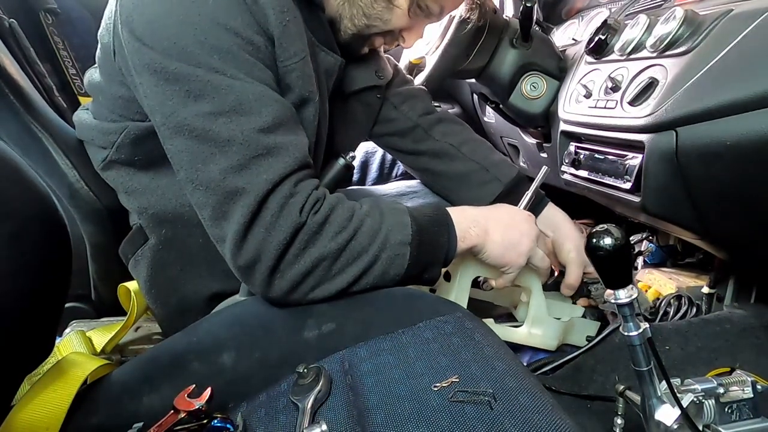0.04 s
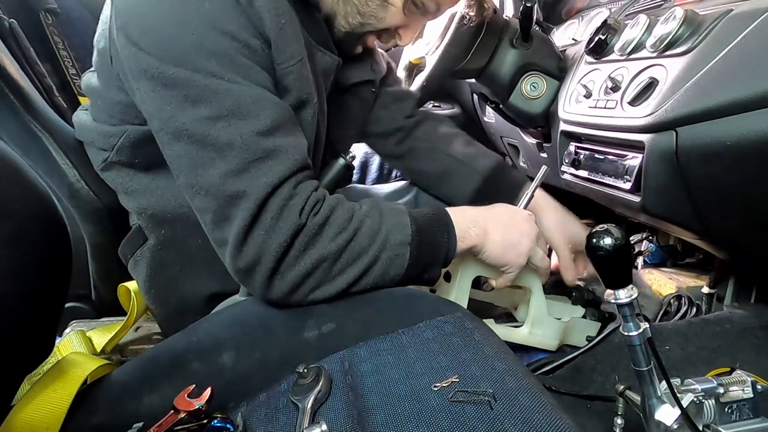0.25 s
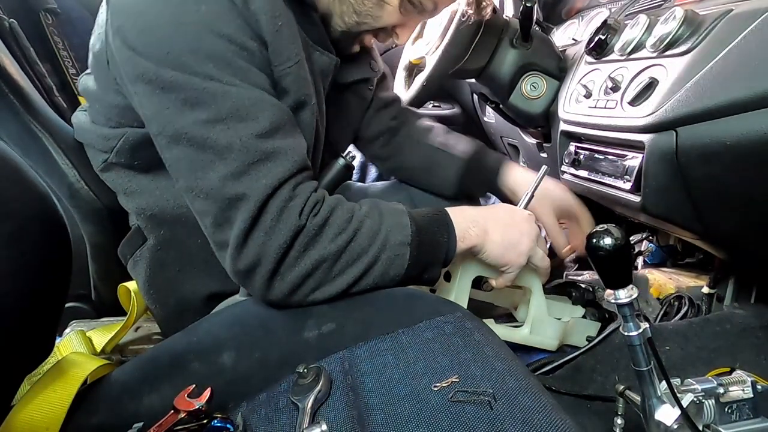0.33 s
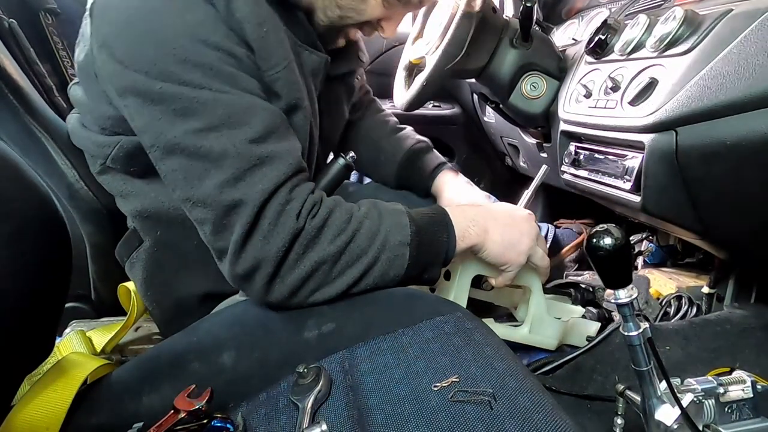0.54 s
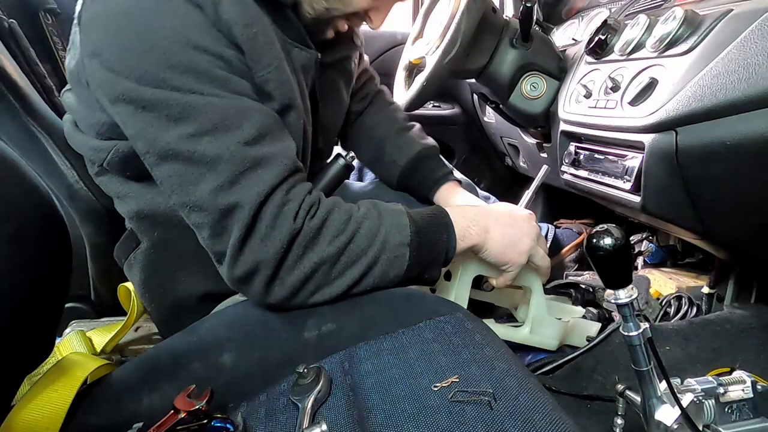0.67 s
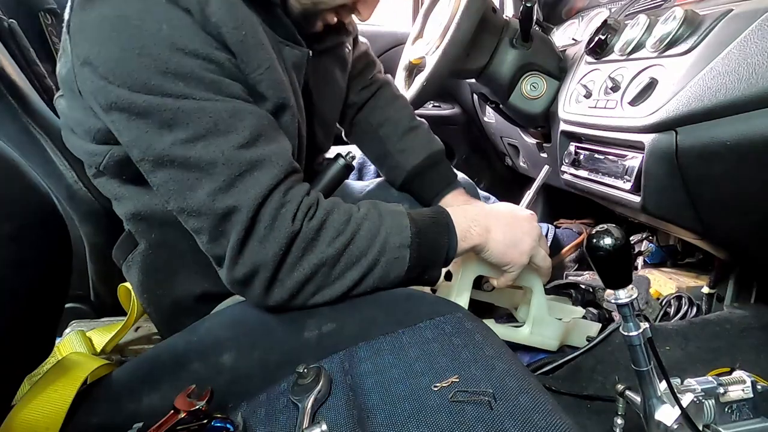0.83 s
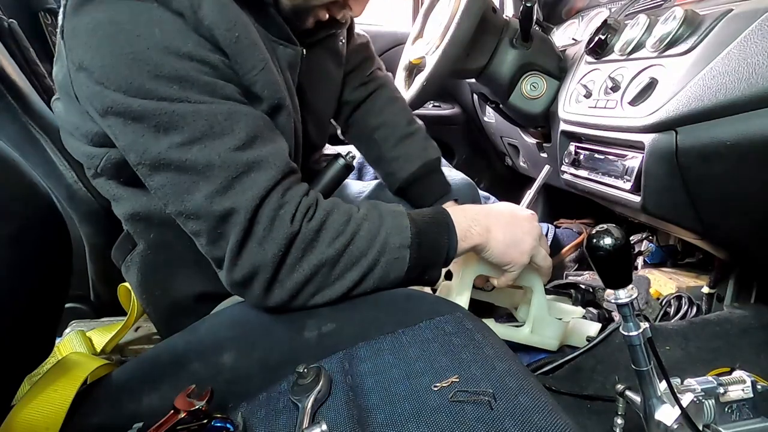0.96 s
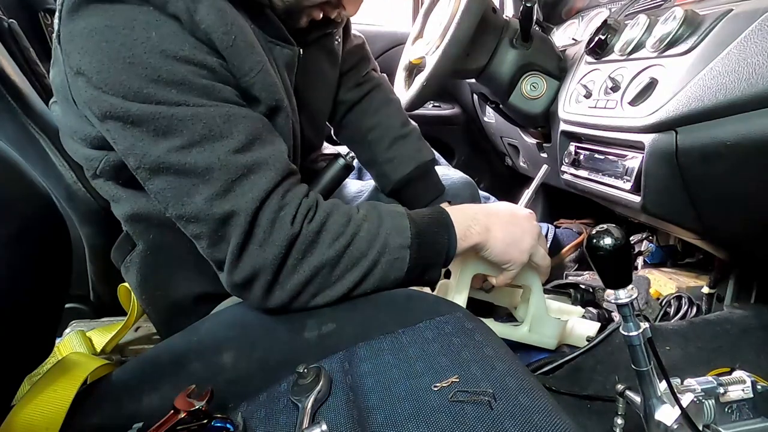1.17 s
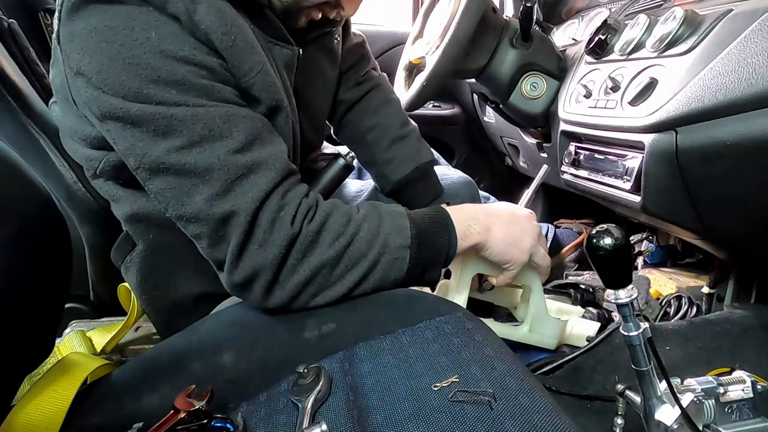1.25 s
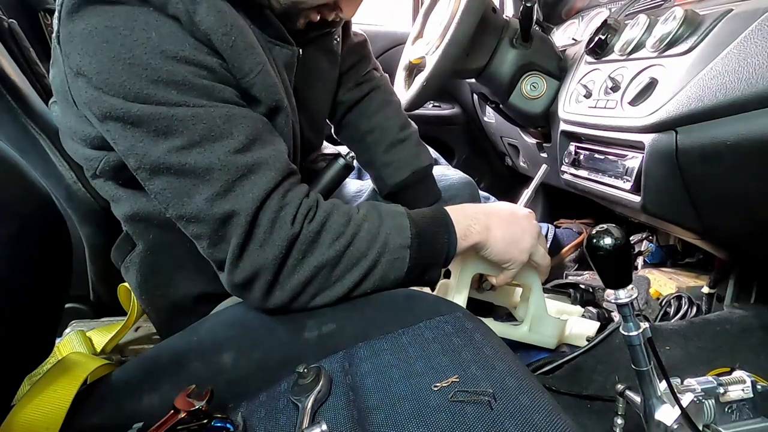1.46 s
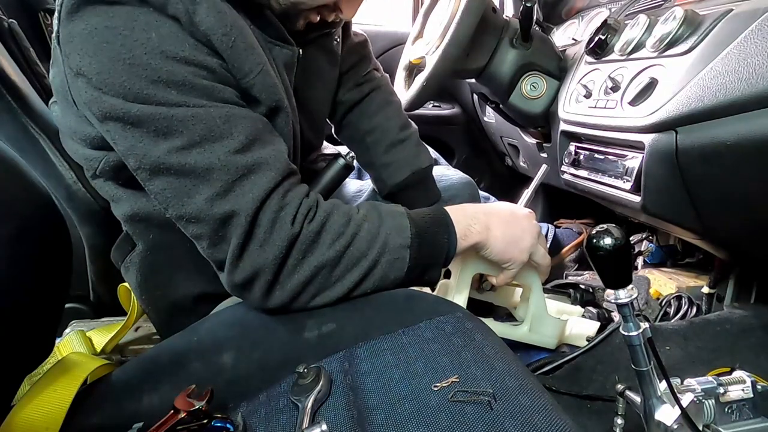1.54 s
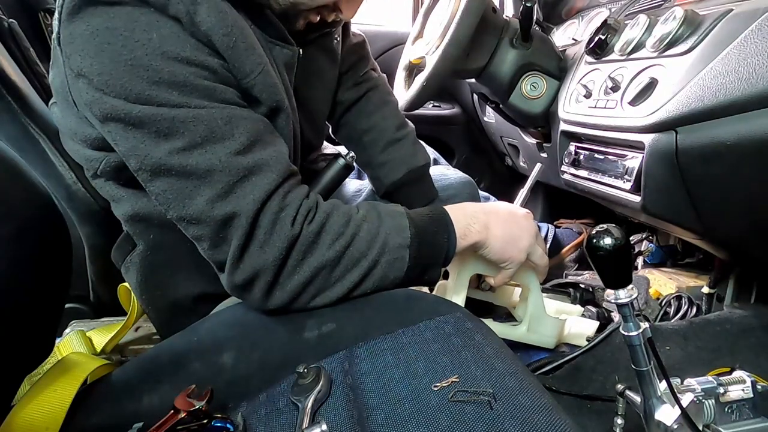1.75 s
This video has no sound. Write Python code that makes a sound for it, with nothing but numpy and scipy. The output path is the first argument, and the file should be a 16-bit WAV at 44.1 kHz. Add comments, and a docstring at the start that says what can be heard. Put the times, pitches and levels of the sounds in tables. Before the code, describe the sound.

Hard clunks and faint scraping of plastic console parts being handled inside a car.

```python
"""Someone works the handbrake lever and loose console parts inside a parked car.
Light knocks and a short scrape lead into two hard clunks (0.31 s, 0.43 s) that ring briefly and make
the cabin boom. A sleeve swishes and air moving over the microphone adds a deep, faint rumble.
From about 0.9 s a plastic part scrapes along its seat among small knocks, cloth rubs and metal clinks.
A third clunk lands at 1.53 s, and a last faint scrape and soft thud follow."""
import sys
import numpy as np
from scipy import signal
from scipy.fft import rfft, irfft
from scipy.io import wavfile

SR = 44100
rng = np.random.default_rng(int(sys.argv[2]) if len(sys.argv) > 2 else 0)


def put_to_file(sound):
    """Save the sound as 16-bit audio at rate SR, in the file named by the first command-line argument."""
    columns = np.atleast_2d(sound).T  # one column per channel
    safe = np.clip(columns, -1, 1)
    whole_steps = np.round(safe * 32767)
    wavfile.write(sys.argv[1], SR, whole_steps.astype(np.int16))


N = 79380
TIME, FREQS = np.arange(N) / SR, np.fft.rfftfreq(N, 1 / SR)

# steady room tone of the car: f/Hz, level/dB
ROOM_TONE = [(59, -66), (100, -16), (240, -0.5), (439, -15), (854, -11.5), (1920, -16), (4810, -29.5),
             (8620, -40.5), (11300, -38.5), (12800, -48), (14500, -79.5)]
# envelope of the deep, faint rumble of air moving over the microphone: t/s, level/dB
RUMBLE_ENVELOPE = [(0, -80), (.3, -62), (.5, -59), (.545, -43), (.59, -54), (.67, -48.5), (.8, -57.5),
                   (.95, -72), (1.8, -67)]
# spectrum of that rumble: f/Hz, level/dB
RUMBLE_COLOUR = [(10, -29), (33, 20.5), (50, -9), (90, -23), (300, -61)]
# envelope of the low shuffling: t/s, level/dB
SHUFFLE_ENVELOPE = [(0, -57), (.09, -61.5), (.2, -44), (.25, -60), (.36, -42.5), (.44, -42.5), (.5, -44),
                    (.6, -56), (.74, -56), (.82, -62.5), (1.05, -69), (1.2, -59), (1.42, -69), (1.6, -50.5),
                    (1.68, -66), (1.8, -59)]
# spectrum of that shuffling: f/Hz, level/dB
SHUFFLE_COLOUR = [(30, -27.5), (70, 5), (125, 4.5), (250, -4), (400, -9), (800, -32), (2000, -46.5)]
# decay of the cabin reverb: f/Hz, t60/s
CABIN_T60 = [(80, 0.6), (250, 0.17), (700, 0.21), (3000, 0.15), (12000, 0.37)]
# send to the cabin reverb: f/Hz, level/dB
CABIN_SEND = [(80, -22), (300, -3), (700, -19.5), (2000, -32), (12000, -15.5)]

# sleeve swishes: peak t/s, level/dB, rise/s, t60/s
SWISHES = [(.39, -49.5, 0.069, 0.44), (0.539, -51.5, 0.14, 0.66)]
# soft spectrum of a swish: f/Hz, level/dB
SWISH_COLOUR = [(240, -38), (400, -8), (704, 0), (829, 0.5), (1200, -6), (3730, -9), (5170, -19),
                (10400, -30.5), (14000, -33)]
# quick cloth rubs: peak t/s, level/dB, half-width/s
RUBS = [(0.277, -44, 0.014), (1.067, -55, 0.026), (1.256, -55, 0.029)]
# bright spectrum of a rub: f/Hz, level/dB
RUB_COLOUR = [(300, -25), (2500, 2), (4500, -5.5), (5800, -4), (7200, -6.5), (8800, -19), (10500, -16),
              (14000, -32)]

# strokes of the sliding plastic part, one envelope each: t/s, level/dB
SCRAPE_STROKES = [
    [(.24, -57.5), (.262, -54.5), (.274, -44), (.285, -44), (.298, -41.5), (.304, -53)],
    [(.94, -74), (1.0, -58.5), (1.045, -64), (1.07, -49), (1.11, -48.5), (1.14, -50), (1.175, -50),
     (1.215, -61.5), (1.255, -56), (1.303, -55), (1.316, -46), (1.335, -51), (1.356, -61), (1.395, -62),
     (1.43, -71.5), (1.485, -60), (1.512, -52), (1.53, -47.5)],
    [(1.63, -72), (1.657, -55.5), (1.685, -76)],
]
# spectrum of its friction hiss: f/Hz, level/dB
SCRAPE_COLOUR = [(240, -14.5), (400, -9), (758, 3), (893, -2.5), (962, -2.5), (1100, -5), (2050, -5),
                 (2650, -12.5), (4200, -7.5), (4520, -13), (10100, -33), (14000, -43)]
# its resonances: f/Hz, bandwidth/Hz, level/dB
SCRAPE_RINGS = [(992, 74, -11.5), (1250, 110, -20), (3180, 23, -18.5), (3400, 210, -14.5),
                (4110, 30, -20.5)]

# small metal pieces touching: t/s, f/Hz, level/dB, t60/s
PINGS = [(0.1716, 4300, -48.5, 0.073), (.3362, 3620, -27, 0.021), (1.1277, 4140, -42, .06),
         (1.5155, 1263, -29, 0.037)]
# modes of a loose metal fitting: f/Hz, level/dB, t60/s
FITTING_MODES = [(840, -12.5, 0.17), (1160, -4, 0.091), (1314, -10.5, 0.14), (2280, -17, 0.11),
                 (3233, 3.5, 0.079), (3420, -4, 0.064), (3840, -16, 0.14)]
# touches on that fitting: t/s, level/dB, tilt/(dB per octave), rise/s
CLINKS = [(0.271, -45.5, 14, 0.0035), (1.3112, -41, -3.5, 0.0016), (1.383, -54, -2, .006)]
# EQ points that voice the knocks: f/Hz
KNOCK_BANDS_HZ = [150, 550, 1200, 2200, 4300, 7000, 11000]
# light knocks and clicks: t/s, t60/s, then level/dB at each EQ point
KNOCKS = [(0.0983, 0.079, -40, -29.5, -41, -41.5, -79, -65, -90),
          (0.118, 0.18, -42.5, -38, -54, -57, -78, -86, -88),
          (0.1709, 0.073, -68, -36.5, -48, -43.5, -45, -56, -89),
          (.283, 0.11, -47, -33.5, -26, -72, -35, -70, -66),
          (.336, 0.08, -24.5, -35.5, -36, -41, -37, -52, -62),
          (0.3761, 0.036, -63, -29, -54, -44, -46, -49.5, -61),
          (0.4226, 0.03, -58, -59, -57, -36, -42, -40, -41.5),
          (.443, 0.069, -51, -28.5, -53, -50, -51, -53, -45),
          (0.876, 0.23, -44, -47.5, -59.5, -79, -89, -85, -92),
          (0.938, 0.18, -49, -51, -53.5, -69, -68, -83, -92),
          (1.131, 0.07, -43.5, -56, -48, -47, -40, -48, -57.5),
          (1.5136, 0.061, -38.5, -34.5, -33, -39, -50, -59, -64),
          (1.537, .035, -64, -68, -56, -39, -25.5, -45, -64)]
# low thuds of console and floor: t/s, f/Hz, level/dB, time to peak/s
THUDS = [(.102, 137.3, -35, 0.014), (.283, 213, -35, 0.009), (.311, 135, -23.5, 0.0081),
         (.310, 245.6, -26, 0.0067), (.427, 151, -28.5, 0.0059), (.427, 254, -28, 0.0044),
         (.459, 283, -27.5, 0.0058), (.462, 147, -34.5, 0.011), (0.878, 149, -65, 0.02),
         (0.938, 247, -36, 0.0038), (1.16, 224, -47, 0.0059), (1.193, 127, -50.5, 0.0073),
         (1.289, 208, -42.5, 0.0028), (1.523, 267.3, -29, 0.00714), (1.539, 139, -27, 0.0071),
         (1.722, 130, -43, 0.012)]

# modes of the lever, its stop and the latch: f/Hz, level/dB, t60/s
LEVER = [(476, -28, 0.075), (566, -33, 0.22), (685, -24.5, 0.1), (776, -19, 0.049), (982, -18, 0.075),
         (1210, -23, 0.07), (1286, -19, 0.06), (1505, -16.5, 0.048), (1901, -28, 0.074),
         (2002, -17.5, 0.046), (2227, -17, 0.045), (2327, -18, 0.038), (2840, -29, 0.052),
         (3240, -16.5, 0.041)]
STOP = [(352, -19.5, 0.043), (691, -10, 0.046), (989, -33, 0.1), (1198, -8, 0.023), (1320, -27, 0.041),
        (1546, -21, 0.032), (1712, -18.5, 0.038), (1873, -21.5, 0.031), (2440, -28, 0.043),
        (2605, -33.5, 0.059), (3420, -32, 0.06)]
LATCH = [(667, -25.5, 0.041), (896, -30, 0.076), (1059, -29, 0.06), (1910, -23.5, 0.026),
         (2580, -37, 0.037), (2948, -32.5, 0.06), (3236, -34.5, 0.08), (4330, -35.5, 0.084),
         (4650, -60, 0.032)]
# spectrum of the dense clatter of each part: f/Hz, level/dB
LEVER_CLATTER = [(60, -16), (200, -3), (450, -4), (1500, 0.5), (3200, -4), (3700, -11), (4550, -5.5),
                 (5100, -25), (6500, -16.5), (8200, -31.5), (9500, -24), (13000, -45)]
STOP_CLATTER = [(60, -12), (200, 2), (450, -2.5), (1700, 0), (2200, -4), (3500, -8.5), (4600, -12.5),
                (5400, -22), (8200, -32), (10500, -25), (14000, -46)]
LATCH_CLATTER = [(60, -38), (250, -4), (450, 0), (900, -0.5), (1600, -1), (2000, 2.5), (3700, -8.5),
                 (4400, -4), (5300, -13.5), (6500, -24), (8000, -32), (13000, -44)]
# hard clunks: t/s, crack/dB, clatter/dB, clatter t60/s, clatter rise/s, modes, clatter spectrum
CLUNKS = [(0.3063, -15, -18, .07, 0.00073, LEVER, LEVER_CLATTER),
          (0.4252, -29, -23.5, 0.085, 0.00061, STOP, STOP_CLATTER),
          (1.5297, -22.5, -25, 0.068, 0.0019, LATCH, LATCH_CLATTER)]
# microphone response: f/Hz, level/dB
MICROPHONE_EQ = [(15, -6), (50, 2), (4600, 1), (5100, -0.5), (6000, 1.5), (11300, 0), (12800, -8),
                 (14200, -26)]

ROOM_TONE_DB, CABIN_BUILD_UP_S = -58, 0.0079
SLIPS_PER_S, SLIP_SPREAD_DB, SCRAPE_HISS_DB = 2500, 0.5, -0.5
TAP_RISE_S, KNOCK_LOW_CUT_HZ = 0.00035, 82
CONTACT_S, MODE_RISE_S = 0.000116, 0.0015
HIGH_CUT_HZ = 14750


def amp(db):
    """Decibels to gain."""
    return 10 ** (np.asarray(db) / 20)


def unit(x):
    """Normalises to rms 1."""
    return x / np.sqrt(np.mean(x ** 2) + 1e-20)


def curve(points, hz):
    """Reads a table on a log-frequency axis."""
    f, value = np.transpose(points)
    return np.interp(np.log(hz + 1), np.log(f + 1), value)


def fader(points):
    """Gain ride through (t/s, level/dB) points, muted beyond 30 ms either side."""
    s, db = np.transpose(points)
    return amp(np.interp(TIME, s, db)) * (TIME >= s[0] - .03) * (TIME <= s[-1] + .03)


def colour(x, spectrum):
    """EQs x by a spectrum, to rms 1."""
    return unit(irfft(rfft(x) * amp(curve(spectrum, FREQS)), N))


def noise(spectrum):
    """Coloured noise at rms 1."""
    return colour(rng.standard_normal(N), spectrum)


def since(start):
    """Seconds since start, zero before it."""
    return np.maximum(TIME - start, 0)


def strike(t, rise, t60):
    """Percussive envelope: quick attack, exponential decay."""
    return (1 - np.exp(-t / rise)) * amp(-60 * t / t60)


def mode(t, hz, db, rise, t60):
    """One struck resonance: a decaying sine."""
    return amp(db) * strike(t, rise, t60) * np.sin(2 * np.pi * hz * t)


def background():
    """Low shuffling, the faint rumble of air moving over the microphone, and quiet room tone."""
    shuffle = fader(SHUFFLE_ENVELOPE) * noise(SHUFFLE_COLOUR)
    rumble = fader(RUMBLE_ENVELOPE) * noise(RUMBLE_COLOUR)
    return shuffle + rumble + amp(ROOM_TONE_DB) * noise(ROOM_TONE)


def cabin(x):
    """The short, dull reverb of an upholstered cabin, each band dying at its own rate."""
    hz, t, bands = signal.stft(rng.standard_normal(N), SR, nperseg=256)
    t60 = curve(CABIN_T60, hz)[:, None]
    decay = amp(curve(CABIN_SEND, hz)[:, None] - 60 * t / t60)
    trim = np.sqrt(2 * np.log(1000) / (t60 * SR))  # a longer decay adds no energy
    tail = signal.istft(bands * decay * trim, SR, nperseg=256)[1][:N]
    fade_in = np.minimum(TIME / CABIN_BUILD_UP_S, 1)
    return signal.fftconvolve(x, tail * fade_in)[:N]


def sleeve():
    """Cloth swishes as the arm moves and hisses where it rubs quickly."""
    motion = sum(amp(db - 60 * since(peak) / t60) * np.exp(-(np.minimum(TIME - peak, 0) / rise) ** 2)
                 for peak, db, rise, t60 in SWISHES)
    rubbing = sum(amp(db) * np.exp(-((TIME - peak) / width) ** 2) for peak, db, width in RUBS)
    return motion * noise(SWISH_COLOUR) + rubbing * noise(RUB_COLOUR)


def scraping():
    """Tiny uneven slips hiss and set the sliding plastic part ringing."""
    slips = (rng.random(N) < SLIPS_PER_S / SR) * rng.choice([-1., 1.], N)
    slips *= amp(SLIP_SPREAD_DB * np.minimum(rng.exponential(1, N), 4))
    rings = sum(amp(db) * unit(signal.lfilter(*signal.iirpeak(hz, hz / width, SR), slips))
                for hz, width, db in SCRAPE_RINGS)
    hiss = amp(SCRAPE_HISS_DB) * colour(slips, SCRAPE_COLOUR)
    return (rings + hiss) * sum(fader(stroke) for stroke in SCRAPE_STROKES)


def ping(start, hz, db, t60):
    """Small metal pieces touch and sound one short mode."""
    return mode(since(start), hz, db, TAP_RISE_S, t60)


def clink(start, db, tilt_db, rise):
    """The metal fitting is brushed and rings; the tilt around 2 kHz sets its brightness."""
    t = since(start)
    return sum(mode(t, hz, db + mode_db + tilt_db * np.log2(hz / 2000), rise, t60)
               for hz, mode_db, t60 in FITTING_MODES)


def knock(start, t60, *band_db):
    """A light contact on plastic: modes so crowded that they make a burst of noise."""
    eq = amp(curve(list(zip(KNOCK_BANDS_HZ, band_db)), FREQS))
    pink = np.sqrt(SR / 2 / np.maximum(FREQS, KNOCK_BANDS_HZ[0]))  # band levels count per octave
    body = irfft(rfft(rng.standard_normal(N)) * eq * pink, N)
    burst = body * strike(since(start), TAP_RISE_S, t60)
    return signal.sosfilt(signal.butter(2, KNOCK_LOW_CUT_HZ, "high", fs=SR, output="sos"), burst)


def thud(start, hz, db, peak_s):
    """A low panel resonance swells and dies."""
    t = since(start)
    swell = t / peak_s * np.exp(1 - t / peak_s)
    return amp(db) * swell * np.sin(2 * np.pi * hz * t)


def clunk(start, crack_db, clatter_db, clatter_t60, clatter_rise, modes, spectrum):
    """A part hits home: a contact crack, then its modes ring inside a short dense clatter."""
    t = since(start)
    contact = (TIME - start) / CONTACT_S - np.pi  # pulse time, centred just after the start
    crack = amp(crack_db) * (1 - 2 * contact ** 2) * np.exp(-contact ** 2)
    ring = sum((-1) ** k * mode(t, hz, db, MODE_RISE_S, t60) for k, (hz, db, t60) in enumerate(modes))
    clatter = amp(clatter_db) * strike(t, clatter_rise, clatter_t60) * noise(spectrum)
    return crack + ring + clatter


def scene():
    """Mono mix: hits and scrapes feed the cabin reverb; sleeve and background stay dry."""
    parts = sum(clunk(*row) for row in CLUNKS)
    parts += sum(knock(*row) for row in KNOCKS)
    parts += sum(thud(*row) for row in THUDS)
    parts += sum(clink(*row) for row in CLINKS)
    parts += sum(ping(*row) for row in PINGS)
    parts += scraping()
    return (parts + cabin(parts) + sleeve() + background())[None]


def record(dry):
    """Microphone colour, then a steep high cut."""
    heard = irfft(rfft(dry) * amp(curve(MICROPHONE_EQ, FREQS)), N)
    high_cut = signal.firwin(511, HIGH_CUT_HZ, window=("kaiser", 9), fs=SR)
    return signal.oaconvolve(heard, high_cut[None], "same")


dry = scene()
out = record(dry)
put_to_file(out)
```